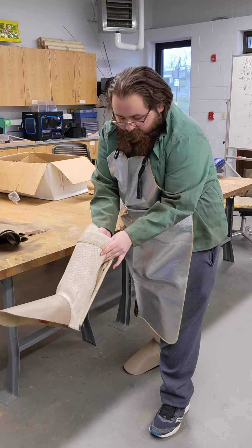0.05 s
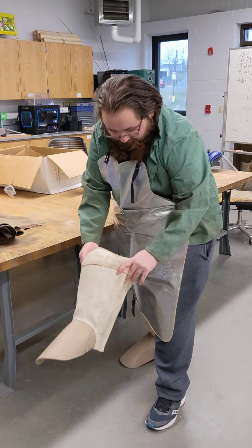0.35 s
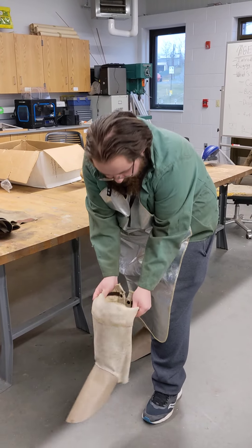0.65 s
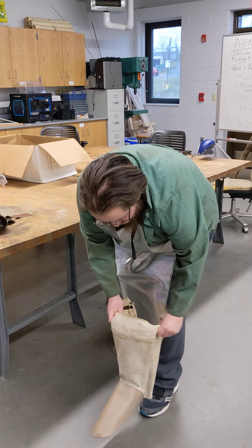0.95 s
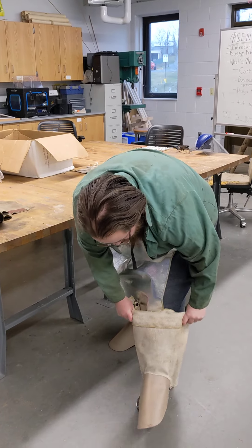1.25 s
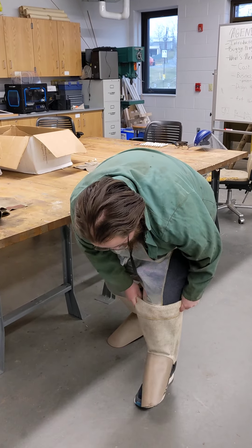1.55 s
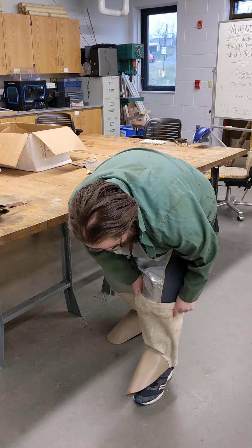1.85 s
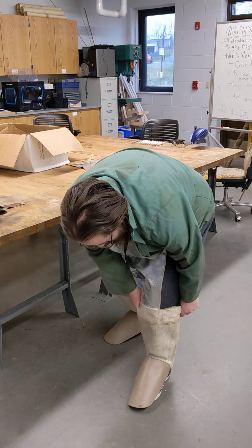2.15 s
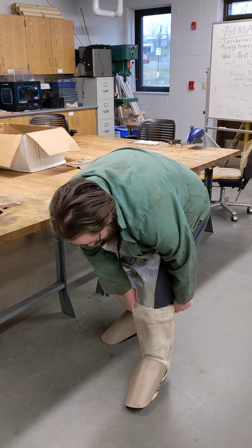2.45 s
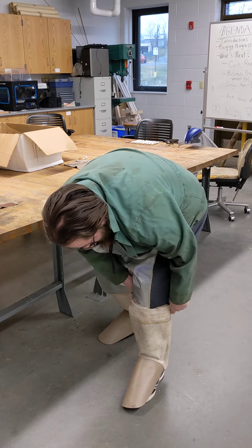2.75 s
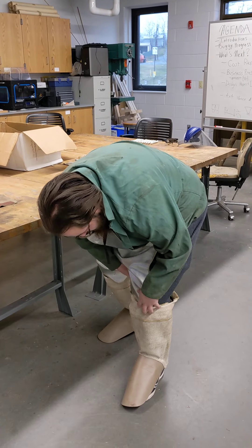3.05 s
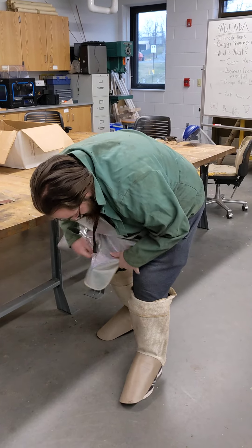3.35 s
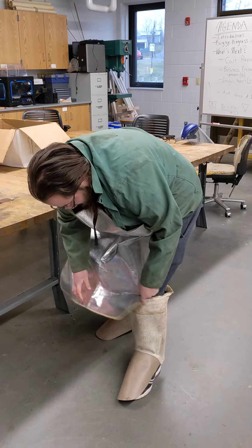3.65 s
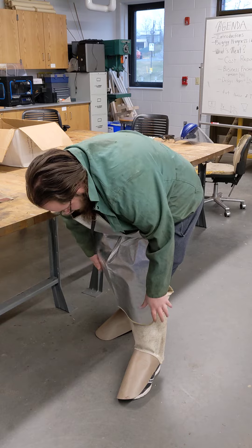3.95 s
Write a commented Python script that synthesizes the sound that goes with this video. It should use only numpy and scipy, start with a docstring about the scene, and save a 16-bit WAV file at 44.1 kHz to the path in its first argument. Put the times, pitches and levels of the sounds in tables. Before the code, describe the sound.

Protective gear rustles, scuffs and pops softly as someone pulls on a leather leg cover, sets a foot down and tugs a plastic apron straight. The stereo sound carries some workshop reverberation and a steady rush of ventilation.

```python
"""A hard-walled workshop, on a stereo pair at a distance where direct sound and room are about equal.
A stiff leather leg cover is pulled over a shoe, then a plastic apron is tugged straight and crinkles.
Cloth slides, stiff sheets crumple and buckle with hollow pops, straps scuff, and the foot comes down.
Ventilation hums and rushes throughout; the room answers every knock."""
import sys
import numpy as np
from scipy import signal
from scipy.fft import rfft, irfft, next_fast_len
from scipy.io import wavfile
from scipy.ndimage import map_coordinates

SR = 44100
rng = np.random.default_rng(int(sys.argv[2]) if len(sys.argv) > 2 else 0)


def persist_wave(psi):
    """Save psi, clipped to +-1, as 16-bit WAV."""
    counts = np.round(np.clip(psi, -1, 1) * 32767).astype(np.int16)
    wavfile.write(sys.argv[1], SR, np.atleast_2d(counts).T)


N = 176400


def amp(db):
    """Decibels as a gain."""
    return 10 ** (np.asarray(db) / 20)


def unit(x):
    """x at rms 1."""
    return x / np.sqrt(np.mean(x ** 2) + 1e-20)


def along(points, hz):
    """Interpolate (f/Hz, value) points on a log frequency axis."""
    f, v = np.transpose(points)
    return np.interp(np.log(hz + 1), np.log(f + 1), v)


def level(rows):
    """Gain per sample from (t/s, level/dB) points; the end values hold."""
    s, db = np.transpose(rows)
    return amp(np.interp(np.arange(N) / SR, s, db))


def wobble(rate):
    """A smooth random curve, rate knots a second."""
    knots = rng.standard_normal(int(N * rate / SR) + 4)
    return map_coordinates(knots, [np.arange(N) * rate / SR])


def filtered(x, response):
    """x through a filter whose gain is response(hz)."""
    n = x.shape[-1]
    padded = next_fast_len(n + 8192)
    return irfft(rfft(x, padded) * response(np.fft.rfftfreq(padded, 1 / SR)), padded)[..., :n]


def spread(pair):
    """Two unrelated signals as a diffuse field at the microphones: alike in bass, apart in treble."""
    # likeness of left and right: f/Hz, correlation/0-1
    likeness = [(60, 1), (150, 1), (300, 0.59), (550, 0.43), (1200, 0), (10000, 0.1)]
    turn = lambda hz: np.arccos(np.clip(along(likeness, hz), -1, 1)) / 2
    mid, side = filtered(pair, lambda hz: np.array([np.cos(turn(hz)), np.sin(turn(hz))]))
    return np.array([mid + side, mid - side])


def colour(x, spectrum):
    """x shaped by (f/Hz, level/dB) points, at rms 1."""
    return unit(filtered(x, lambda hz: amp(along(spectrum, hz))))


def rush(spectrum):
    """Diffuse stereo noise of rms 1."""
    return colour(spread(rng.standard_normal((2, N))), spectrum)


def grains(rate, scatter_db):
    """Tiny slips of uneven size at random moments, about rate a second."""
    slips = (rng.random(N) < rate / SR) * rng.standard_normal(N)
    return unit(slips * amp(scatter_db * np.clip(rng.standard_normal(N), -2, 2)))


def knock(modes, crack_hz, crack_db=-8, crack_t60=.018, attack_s=.0007):
    """Briefly ringing, slightly detuned modes under a crack that is dull above crack_hz."""
    t = np.arange(SR // 8) / SR
    ring = 0
    for k, (hz, db, t60) in enumerate(modes):
        decay = amp(db + rng.normal(0, 1) - 60 * t / t60)
        ring += (-1) ** k * decay * np.sin(2 * np.pi * hz * rng.normal(1, .025) * t)
    band = lambda hz: hz / (hz + 400) / (1 + (hz / crack_hz) ** 3)
    crack = unit(filtered(rng.standard_normal(len(t)), band)) * amp(crack_db - 60 * t / crack_t60)
    return (ring + crack) * (1 - np.exp(-t / attack_s))


def swing(centre_hz, q):
    """One heavily damped swing, at peak 1."""
    def resonance(hz):
        damping = 1j * hz * centre_hz / q
        return (damping / (centre_hz ** 2 - hz ** 2 + damping)) ** 2
    pulse = filtered(signal.unit_impulse(SR // 8, 40), resonance)
    return pulse / np.abs(pulse).max()


def in_room(x, wet_db, wall_delay_s=.0015, build_s=.0027, near_db=-6.5, near_t60=.022):
    """A mono sound reaches both microphones directly, off floor and bench, and as a room tail."""
    # decay of the room: f/Hz, t60/s
    room_decay = [(120, 0.39), (500, 1), (2000, 0.67), (6000, 0.58), (14000, 0.49)]
    hz, t, bands = signal.stft(rng.standard_normal((2, 24000)), SR, nperseg=256)
    tail = signal.istft(bands * amp(-60 * t / along(room_decay, hz)[:, None]), SR, nperseg=256)[1]
    t = np.arange(tail.shape[1]) / SR
    tail *= 1 - np.exp(-np.maximum(t - wall_delay_s, 0) / build_s)
    tail *= amp(wet_db) / np.linalg.norm(tail[0])
    near = rng.standard_normal(tail.shape) * amp(-60 * t / near_t60)
    near *= amp(near_db) / np.linalg.norm(near[0])
    answer = spread(tail + near)
    right_lag_s = rng.uniform(.00002, .00022)  # each spot is a little farther from the right microphone
    answer[0, 0] += 1
    answer[1, round(right_lag_s * SR)] += 1
    return signal.fftconvolve(x[None], answer, axes=1)[:, :N]


def add(out, s, x):
    """Mix x into out from time s."""
    i = max(round(s * SR), 0)
    out[:, i:i + x.shape[1]] += x[:, :N - i]


def moving_in_room(x, wet_db, count=14):
    """A moving source meets ever new reflections: overlapping stretches each get their own."""
    out, hop = np.zeros((2, N)), N // count
    for k in range(count + 1):
        i = np.arange(max(k - 1, 0) * hop, min((k + 1) * hop, N))
        crossfade = np.cos(np.pi / 2 * (i / hop - k))
        add(out, i[0] / SR, in_room(x[i] * crossfade, wet_db))
    return out


def ventilation(air_db=-55.5):
    """Steady rushing air all round the microphones, and the slightly wavering hum of the fan motor."""
    # spectrum of the air: f/Hz, level/dB
    air = [(20, -57), (35, -12), (56, 4), (72, -3.5), (105, -4), (170, -1.5), (290, -6.5), (410, -3.5),
           (650, -6.5), (1000, -8.5), (2000, -21.5), (4000, -26.5), (7000, -32), (11000, -38),
           (15000, -31.5)]
    # motor partials: f/Hz, level/dB, left over right/dB
    hum = [(119.8, -47.5, -3), (237.8, -65, 2.5), (358, -65.5, 7.5)]
    t = np.arange(N) / SR
    out = amp(air_db) * rush(air)
    for k, (hz, db, pan_db) in enumerate(hum):
        drift = .14 * (k + 1) ** 2 * wobble(4.8)
        waver = amp(.5 * (k + 2.5) * wobble(6.18))
        tone = np.sqrt(2) * np.sin(2 * np.pi * hz * t + drift) * waver
        out += tone * amp([[db + pan_db / 2], [db - pan_db / 2]])
    return out


def sliding(gain_db=-2.5):
    """Cloth slides in fine grains, weave rubbing on weave."""
    # strength of the rubbing: t/s, level/dB
    strokes = [(0, -63.5), (.14, -69.5), (.25, -60.5), (.38, -74), (.45, -68), (.62, -63.5), (.69, -65.5),
               (.75, -55.5), (.83, -63.5), (.92, -67), (1.25, -66.5), (1.45, -65.5), (1.53, -57.5),
               (1.57, -56), (1.63, -77), (1.7, -58), (1.8, -62), (1.87, -65), (1.96, -59), (2.0, -70),
               (2.09, -63), (2.12, -59), (2.17, -71), (2.22, -73), (2.31, -64.5), (2.37, -85), (2.45, -81),
               (2.52, -98), (2.65, -81), (2.68, -65), (2.95, -64), (3.17, -55), (3.27, -58), (3.4, -62.5),
               (3.56, -73.5), (3.66, -60.5), (3.72, -63), (3.78, -71), (3.9, -76), (3.94, -61), (4, -122.5)]
    # spectrum of the cloth: f/Hz, level/dB
    cloth = [(100, -23), (300, -50), (1200, 10.5), (2300, 4), (3200, 3.5), (5300, -1.5), (7100, 0),
             (9000, -5.5), (11000, -9), (13000, -3.5), (15500, -6)]
    rub = colour(grains(rate=6300, scatter_db=2), cloth) * level(strokes)
    return amp(gain_db) * moving_in_room(rub, wet_db=2)


def crumpling(gain_db=-6):
    """Coarser slips in the stiff sheets, sounding through their hollow body."""
    # strength of the handling: t/s, level/dB
    handling = [(0, -55.5), (.15, -63), (.22, -73), (.37, -53), (.46, -74), (.7, -61), (.8, -52.5),
                (1.05, -59.5), (1.17, -57.5), (1.5, -58.5), (1.56, -51.5), (1.64, -53.5), (1.95, -60),
                (2.09, -67), (2.12, -43.5), (2.18, -49), (2.3, -60), (2.42, -69), (2.55, -89), (2.65, -79),
                (2.7, -53.5), (2.92, -59), (3.12, -54.5), (3.19, -41), (3.33, -59), (3.43, -54),
                (3.465, -49), (3.51, -59), (3.6, -57.5), (3.85, -63), (4, -61)]
    # spectrum of the leather: f/Hz, level/dB
    leather = [(30, -21), (100, -13), (250, 4), (420, 6.5), (650, -3.5), (1000, -2), (1600, -7),
               (2400, -5.5), (3500, -23.5), (8000, -34)]
    slips = colour(grains(rate=1000, scatter_db=2.5), leather) * level(handling)
    flicker = amp(-.53 * wobble(35))
    return amp(gain_db) * moving_in_room(slips * flicker, wet_db=0)


def pops():
    """Each buckle or knock rings a patch of sheet for a few cycles."""
    # buckles and knocks: t/s, level/dB, f/Hz, t60/s
    buckles = [(.203, -41, 787, 0.017), (.225, -41, 425, 0.036), (.312, -31.5, 290, 0.016),
               (.352, -48, 1390, .02), (0.375, -42, 1170, 0.02), (.584, -34.5, 474, 0.025),
               (.603, -40, 424, 0.017), (.715, -44, 383, 0.078), (.936, -34.5, 417, 0.039),
               (.977, -38.5, 382, 0.045), (1.544, -35, 430, 0.013), (1.564, -33, 323, 0.033),
               (1.5875, -28, 435, 0.023), (1.808, -36, 1940, 0.0057), (1.95, -35, 1490, 0.014),
               (2.824, -37.5, 1095, 0.015), (2.8757, -27.5, 915, 0.019), (3.165, -37, 417, 0.039),
               (3.181, -35, 423, 0.02), (3.202, -34, 1290, 0.017), (3.207, -34.5, 466, 0.044),
               (3.227, -38, 915, 0.016), (3.4165, -32.5, 940, 0.025), (3.422, -31.5, 510, 0.019),
               (3.46, -33, 690, 0.018), (3.4665, -29.5, 1270, 0.013), (3.476, -36, 149, 0.034),
               (3.813, -34.5, 400, 0.017), (3.833, -45, 1760, 0.013), (3.9558, -34.5, 1414, 0.013)]
    # modes of a sheet: ratio to its pitch, level/dB
    sheet = [(.5, -19), (0.782, -7.5), (1, -2), (1.38, -13.5), (2.1, -17.5)]
    out = np.zeros((2, N))
    for s, db, hz, t60 in buckles:
        modes = [(hz * ratio, mode_db, t60) for ratio, mode_db in sheet]
        add(out, s, amp(db) * in_room(knock(modes, crack_hz=1.08 * hz), wet_db=-2.5))
    return out


def scuffs(pivot_hz=6000, contacts=3, rise_s=.0013):
    """Straps and edges scuff in short bursts of friction, each from a few points of contact."""
    # bursts: t/s, level/dB, t60/s, tilt/dB per octave
    bursts = [(.264, -49, 0.036, 11), (0.308, -36.5, 0.037, 7), (0.381, -53, 0.059, 5),
              (0.577, -44.5, 0.036, -1.5), (0.746, -41.5, 0.068, -1), (1.54, -41.5, .07, -12),
              (1.548, -48.5, 0.12, -1.5), (1.564, -46.5, 0.14, -11), (1.807, -50, 0.022, -4),
              (2.104, -45, 0.11, -8), (2.172, -45, .015, -2), (2.329, -59, .02, 3),
              (2.674, -54.5, 0.08, -6), (2.698, -54, 0.03, -1), (2.753, -45, 0.031, -0.5),
              (2.777, -53.5, 0.094, 5), (2.892, -36.5, 0.013, -14), (3.479, -45, 0.011, 5),
              (3.576, -49, 0.016, 0), (3.811, -50, 0.0039, -8)]
    # friction spectrum before the tilt: f/Hz, level/dB
    scrape = [(300, -21), (1500, 5.5), (4000, 5), (7500, 1.5), (11000, -4), (15000, -0.5)]
    out, t = np.zeros((2, N)), np.arange(SR // 5) / SR
    for s, db, t60, tilt_db in bursts:
        tilted = lambda hz: amp(along(scrape, hz) + tilt_db * np.log2((hz + 500) / pivot_hz))
        hiss = unit(filtered(rng.standard_normal((contacts, len(t))), tilted))
        envelope = amp(db - 60 * t / t60) * (1 - np.exp(-t / rise_s))
        for contact in hiss * envelope / np.sqrt(contacts):
            add(out, s, in_room(contact, wet_db=-2))
    return out


def flapping(gain_db=-2):
    """The loose cover gives a low shudder, strongest while the leg pushes in."""
    # strength of the flapping: t/s, level/dB
    swell = [(.85, -75), (1.02, -50.5), (1.12, -44), (1.24, -47), (1.36, -48.5), (1.5, -46.5), (1.6, -46.5),
             (1.7, -53), (1.9, -51), (2.08, -57)]
    # spectrum of the loose cover: f/Hz, level/dB
    cover = [(25, -35), (90, -6.5), (160, -3.5), (260, -16.5), (450, -12), (900, -18.5), (3000, -61)]
    shudder = 1.2 * wobble(22)
    return amp(gain_db + shudder) * level(swell) * rush(cover)


def snaps():
    """Taut edges of the cover and the apron snap crisply, without ringing."""
    # flicks of an edge: t/s, level/dB, centre f/Hz, sharpness Q
    flicks = [(1.553, -31.5, 1050, 0.82), (1.8087, -36, 2200, 0.61), (3.4795, -40, 3670, 2),
              (3.8106, -29, 1520, 0.76)]
    out = np.zeros((2, N))
    for s, db, hz, q in flicks:
        add(out, s - .001, amp(db) * in_room(swing(hz, q), wet_db=-3))
    return out


def footfall(sole_db=-2.5):
    """The sole thuds on the floor and the toe cap claps down on it."""
    # the landing and the slaps after it: t/s, level/dB
    slaps = [(2.103, -30), (2.1219, -38), (2.145, -46.5), (2.156, -41.5), (2.22, -49), (2.295, -46)]
    # modes of the toe cap: f/Hz, level/dB, t60/s
    toe_cap = [(171, -10, 0.06), (250, -3, 0.047), (346, -5, 0.04), (453, 1, 0.035), (590, -0.5, 0.047),
               (725, -6, 0.021), (980, -10.5, 0.034), (1490, -12, 0.02), (1800, 1, 0.0052)]
    out = np.zeros((2, N))
    thud = amp(sole_db) * swing(centre_hz=372, q=.96)
    for s, db in slaps:
        clap = knock(toe_cap, crack_hz=2070)
        add(out, s, amp(db) * in_room(clap + thud, wet_db=-1))
    return out


def crinkling():
    """The apron's thin plastic creases in fine, airy ticks."""
    # strength of the creasing: t/s, level/dB
    tugs = [(2.9, -90), (3.05, -72), (3.17, -80), (3.25, -68), (3.34, -72), (3.45, -81), (3.57, -78),
            (3.66, -60.5), (3.74, -75), (3.85, -90)]
    # spectrum of the plastic: f/Hz, level/dB
    plastic = [(1000, -30), (3500, 9), (6000, 1), (9500, -2), (13000, 1), (15500, 6)]
    ticks = colour(grains(rate=1400, scatter_db=3.5), plastic) * level(tugs)
    return moving_in_room(ticks, wet_db=-2)


def scene():
    """All the handling over the ventilation, as it reaches the microphones."""
    textures = ventilation() + sliding() + crumpling() + crinkling() + flapping()
    return textures + pops() + snaps() + scuffs() + footfall()


def record(dry, top_hz=15930):
    """The two microphones differ a little in colour; nothing is kept above top_hz."""
    # balance of the pair: f/Hz, left over right/dB
    balance = [(60, 1.5), (130, 0), (250, -0.5), (500, 0), (1000, 0.5), (3000, 0.5), (8000, 1), (13000, -1)]
    sides = np.array([[.5], [-.5]])
    return filtered(dry, lambda hz: amp(along(balance, hz) * sides) * (hz < top_hz))


dry = scene()
out = record(dry)
persist_wave(out)
```